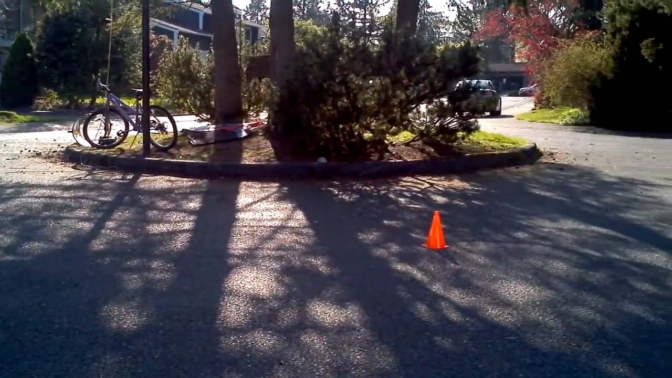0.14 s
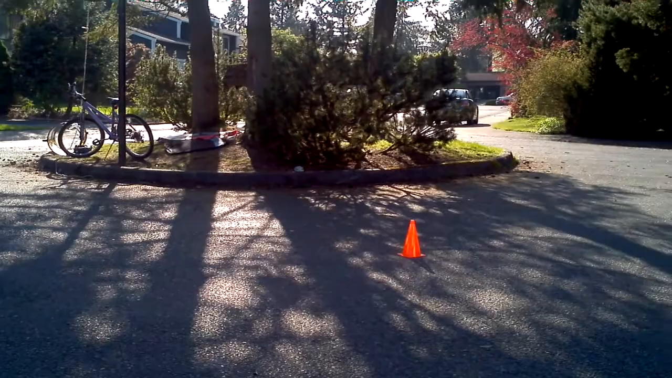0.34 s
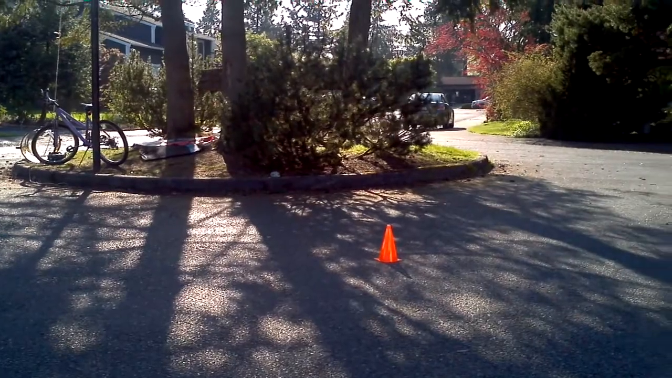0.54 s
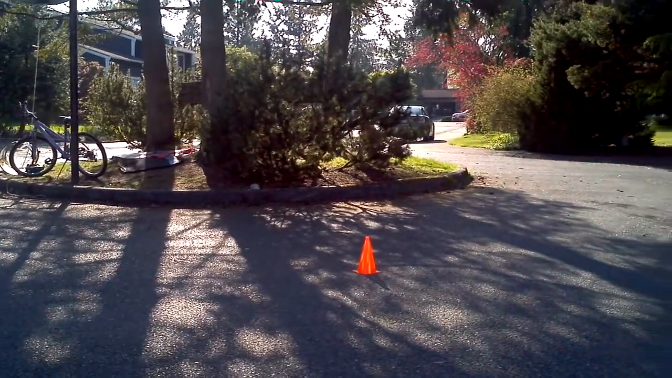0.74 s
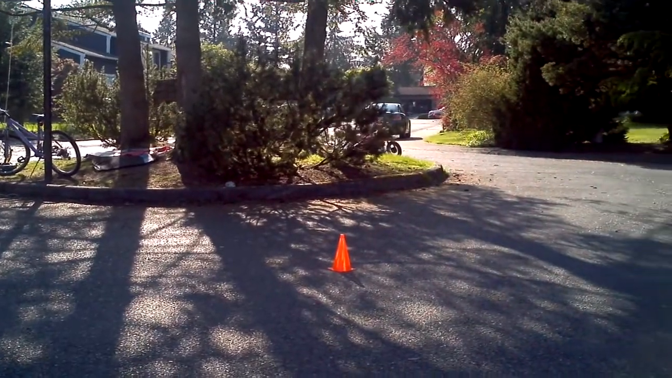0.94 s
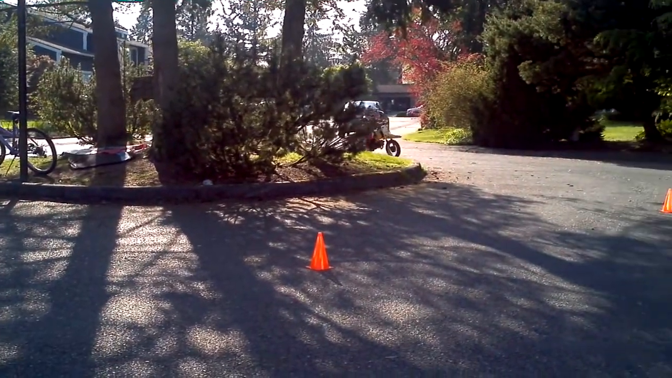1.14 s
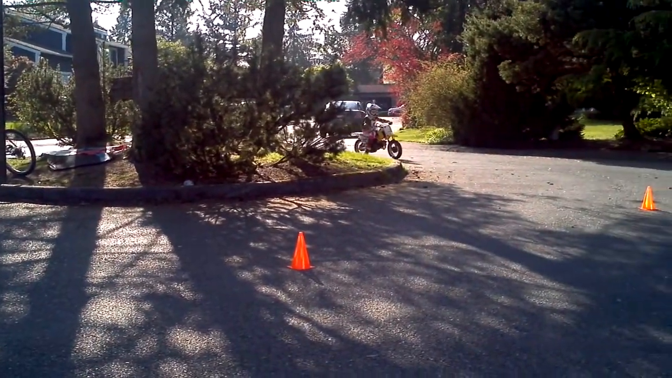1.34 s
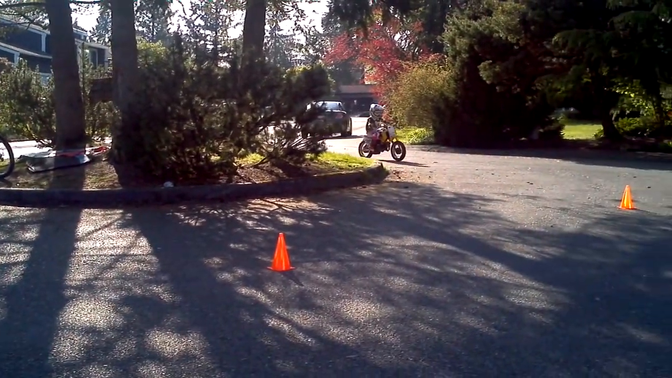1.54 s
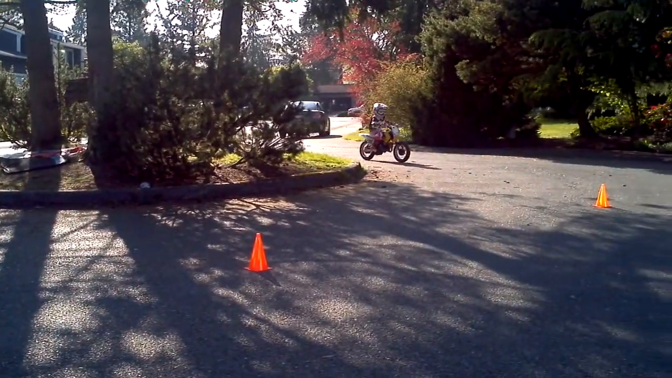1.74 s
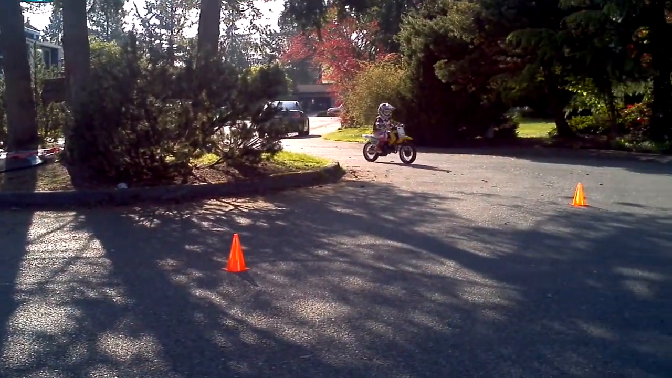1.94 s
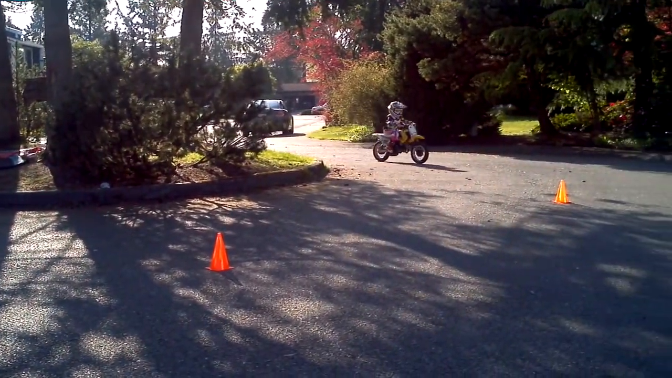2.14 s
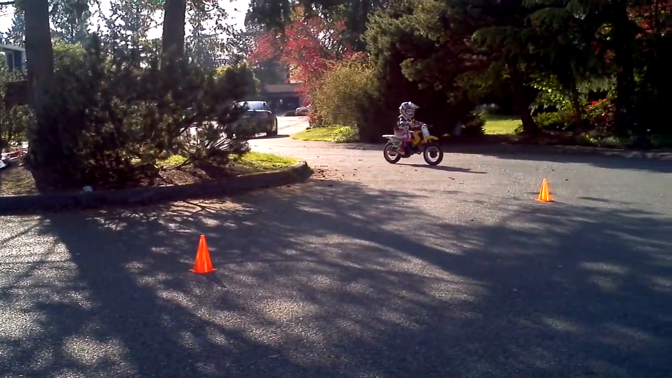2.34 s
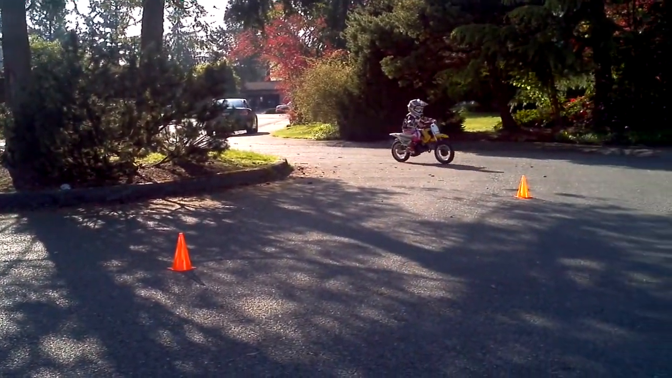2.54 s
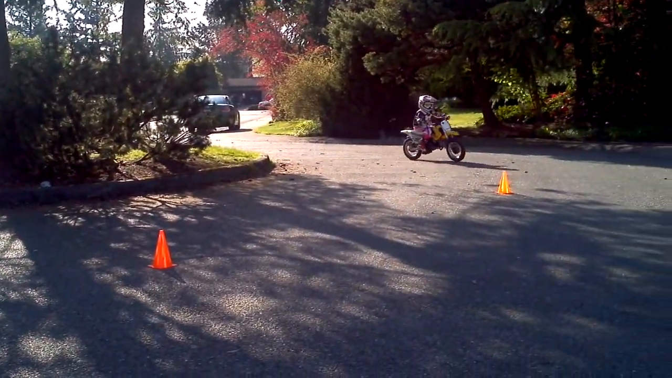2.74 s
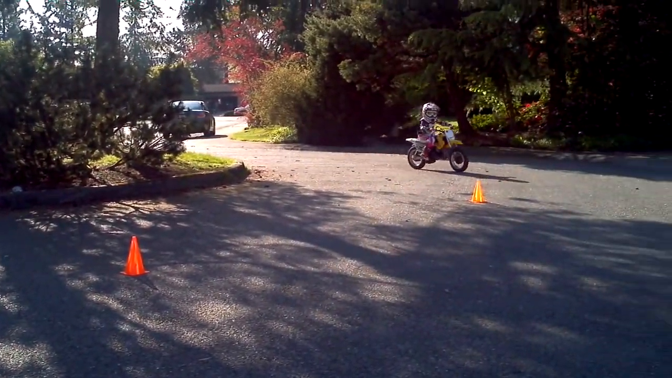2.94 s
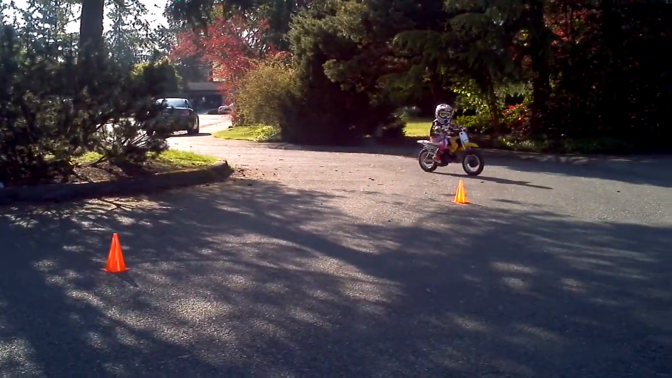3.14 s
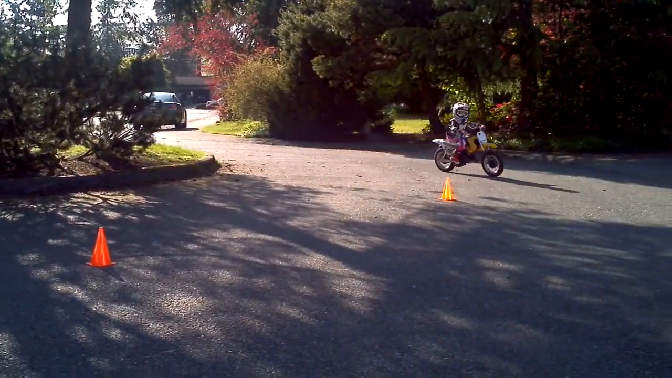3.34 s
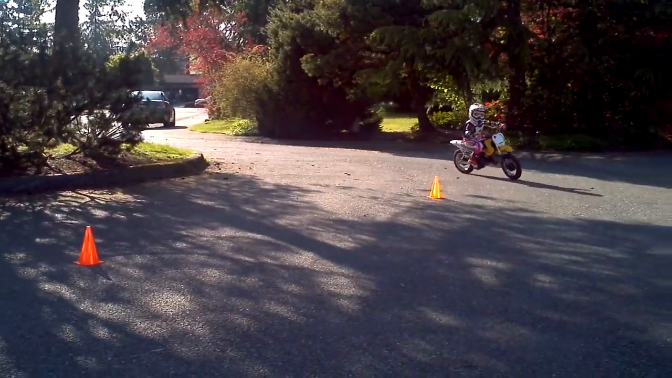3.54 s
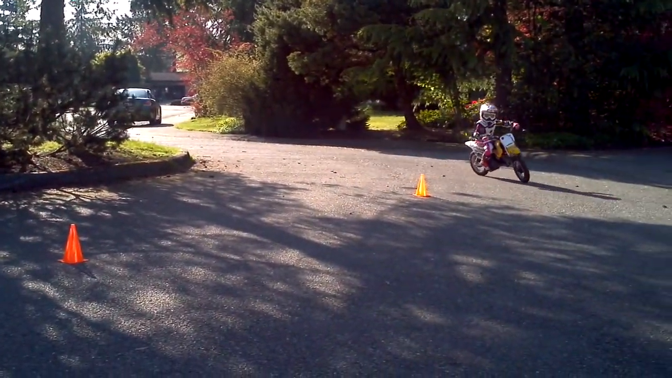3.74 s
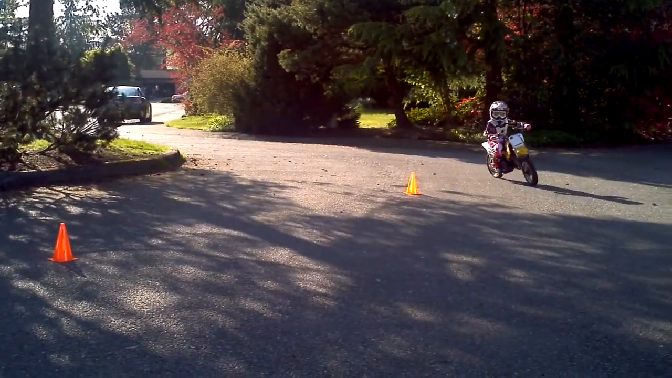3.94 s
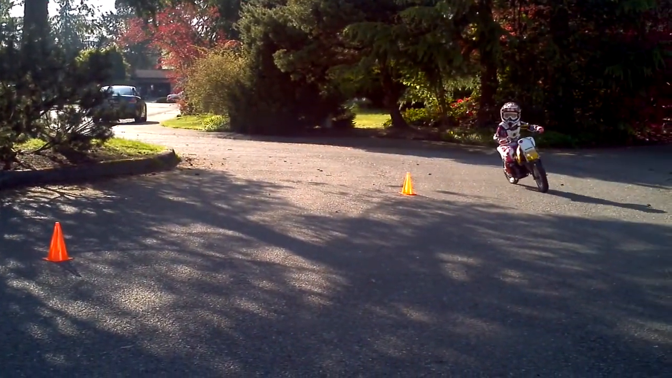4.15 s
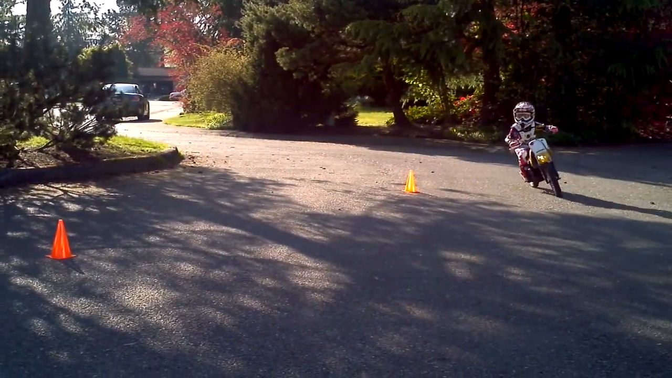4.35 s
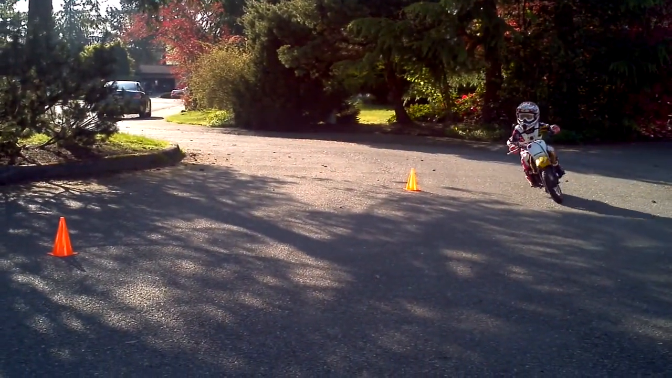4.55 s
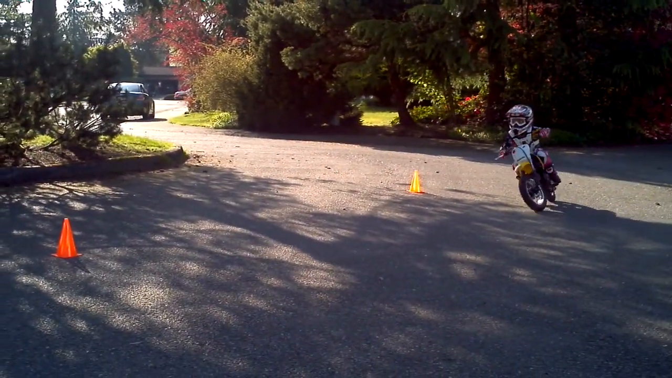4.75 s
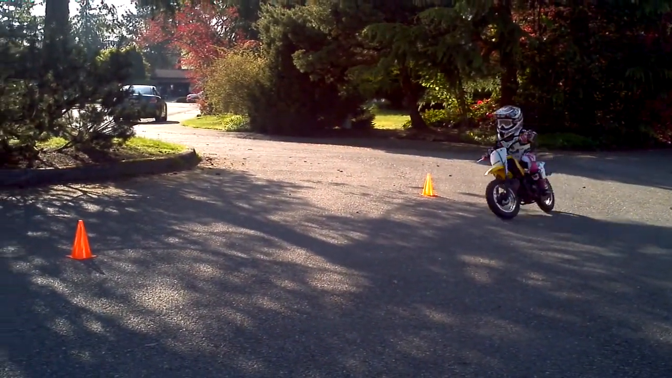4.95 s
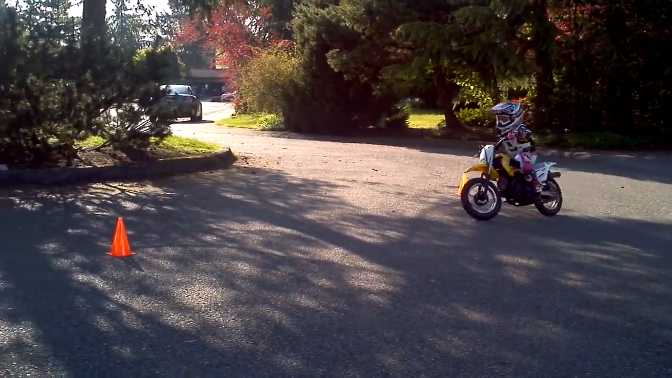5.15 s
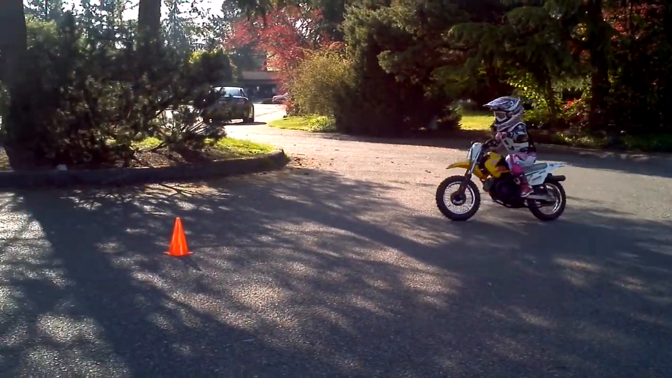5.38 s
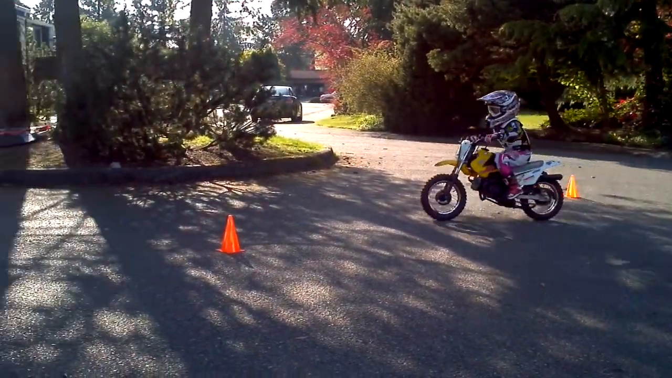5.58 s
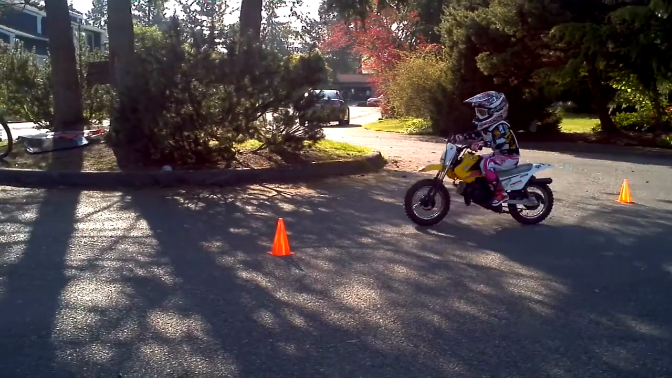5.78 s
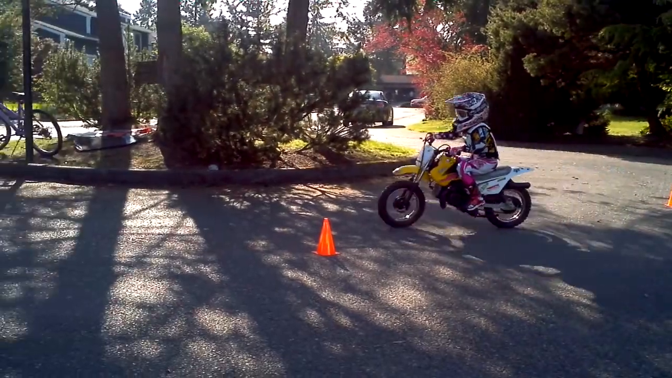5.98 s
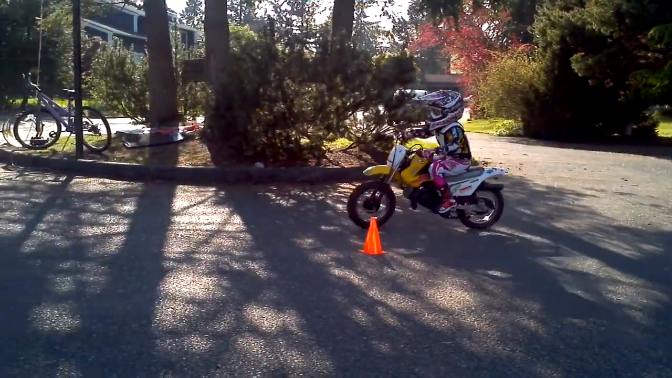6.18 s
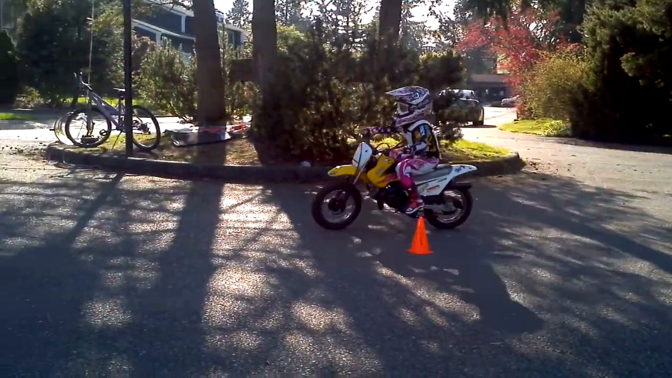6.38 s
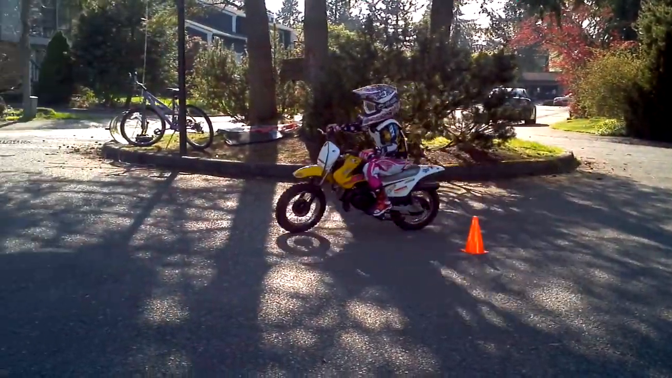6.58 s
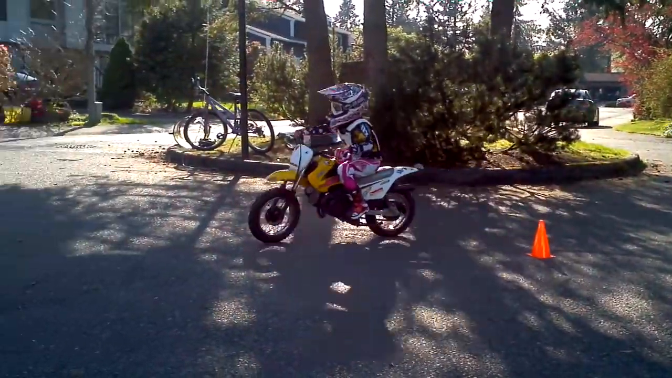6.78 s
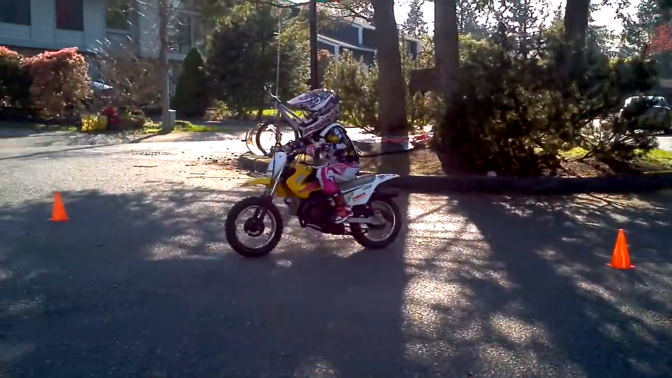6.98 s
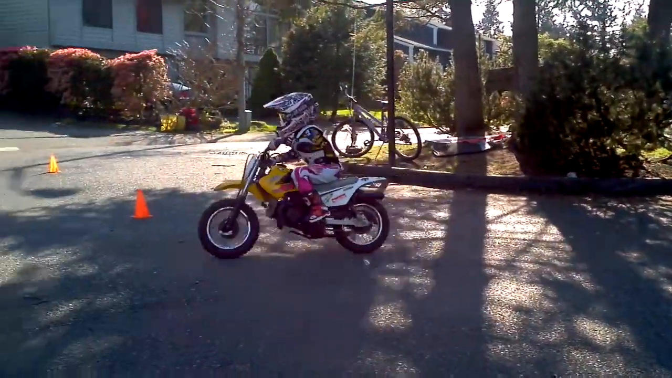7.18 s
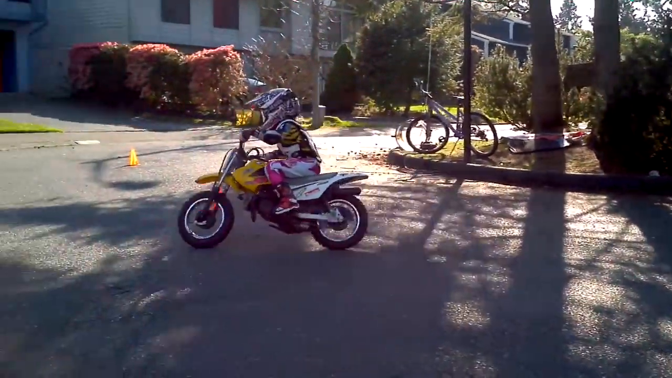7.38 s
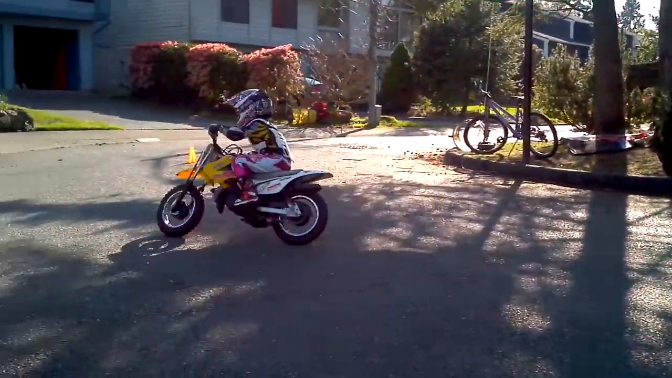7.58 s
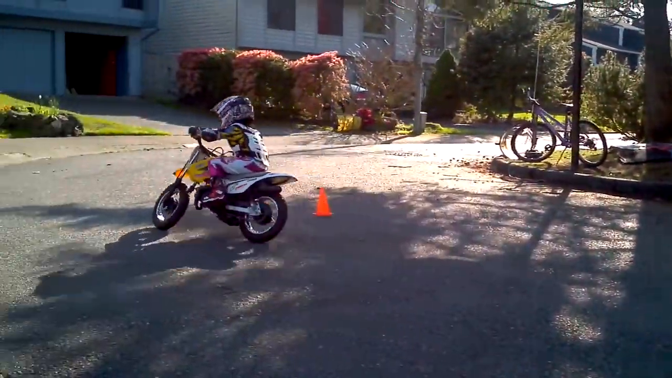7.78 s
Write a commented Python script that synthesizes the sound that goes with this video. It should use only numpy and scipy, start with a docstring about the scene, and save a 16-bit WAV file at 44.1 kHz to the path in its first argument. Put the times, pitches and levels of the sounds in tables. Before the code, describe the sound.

A quiet open street with faint far traffic and leaf hiss, heard through a small hand-held stereo microphone. In the first 0.6 seconds low wind puffs bump the microphone, strongest near 0.5, while a bird gives tiny falling chirps. A distant two-stroke motorbike putters weakly, about ten pops a second over soft rapid chugging. Around 1.3 to 1.6 it revs into a quicker, rising hooting buzz, then drops back to uneven pops. Birdsong flits faintly from 2.5 to 3.7, and a very thin high whine swells near 2.6. From 4 the engine grows nearer, hollow and irregular, with metallic ticking. From 5.8 to 6.5 it fires fast and evenly, a loud nasal buzz. By 7 it is closest: separate hard, raspy barks about ten per second, crackling with metal rattle, still loud when the sound stops just before 8.

```python
"""Two-stroke motorbike approaching on a quiet street

A small two-stroke putters ever closer to a hand-held camera: most firings come every second to fifth turn, ring
pipe and metal as decaying modes and add turbulent noise; the other turns chug in soft low cycles, blow the pipe
hoot weakly and beat the rattle. Far traffic and leaves are shaped noise, wind is lumpy bass noise with short
puffs, a far bird sings gliding sines, and a thin whine comes and goes. The two microphone ports are widened by
delayed subtraction."""
import sys
import numpy as np
from scipy import signal
from scipy.fft import rfft, irfft, next_fast_len
from scipy.io import wavfile
from scipy.ndimage import uniform_filter1d, map_coordinates

SR = 44100
rng = np.random.default_rng(int(sys.argv[2]) if len(sys.argv) > 2 else 0)


def pcm_store(signal):
    """Save signal as 16-bit PCM."""
    levels = np.round(np.clip(np.atleast_2d(signal), -1, 1) * 32767)
    wavfile.write(sys.argv[1], SR, levels.astype(np.int16).T)


def level_to_linear(level):
    """Convert decibel levels to linear amplitude factors, elementwise."""
    exponent = np.asarray(level, float) / 20
    return 10 ** exponent


N = 344862
T = np.arange(N) / SR  # s

# Crank speed and strength of the chug: time_s, turns_per_s, chug_db
RUNNING = [(0.0, 52, -59), (0.3, 48, -62.5), (0.59, 43, -59.5), (0.94, 44, -60), (1.222, 48, -55.5),
           (1.439, 50, -51), (1.57, 56, -55.5), (1.79, 44, -55.5), (2.41, 40, -53), (3.3, 46, -52),
           (3.739, 43.9, -49.5), (4.4, 44, -47), (5.0, 37, -44.5), (5.2, 45, -43.5), (5.599, 43.6, -42),
           (5.9, 48.3, -38), (6.119, 49.4, -39), (6.501, 45, -36), (6.66, 53, -39.5), (6.86, 42, -38.5),
           (7.82, 42, -37)]
# Colour as the bike turns and loads up: time_s, then re chug hoot_db, low_bark_db, body_db, crack_db,
# then re crack crankcase_db, cover_ring_db
COLOUR = [(0.2, -3, 7, 4, 2.5, -14, -14), (0.8, -5, 2, -2, 0.5, 7.5, 4), (1.35, 1.5, 8.5, 2, 3, -4, 3),
          (1.6, 1, 8.5, 9, -1, 1, 6), (2.1, -2.5, 2.5, 8.5, -1, -1, 3), (3.0, -2.5, -3, 11, -1.5, 3.5, 4),
          (3.9, 6.5, 3, 5, 0, 0, 7.5), (4.499, 6.5, 9.5, 9.5, -4.5, 5, 8),
          (5.001, 3, 6.5, 6.5, 3.5, 4.5, 4), (5.6, -7.5, 7.5, 7.5, 5.5, 1, 6.5),
          (6.2, -9.5, 9.5, 9.5, 8, 4.5, -25), (6.802, -7.5, 6.5, 6.5, 5.5, 0.5, 3),
          (7.3, -14.5, 11.5, 0, 3, 1, 3), (7.5, 0.5, 13.5, 8, 4.5, 2, 2.5), (7.8, -7, 11, -7, 1.5, 1.5, -1)]
# Drift of the pipe notes as the bike turns and loads up: time_s, hoot_percent, low_bark_percent,
# bark_percent, silencer_percent
DRIFT = [(0.3, -1.0, 6, 0.5, 0.1), (1.5, -1.1, -5.5, 2.4, 0.16), (3.0, -0.4, -5, 1.5, 0.1),
         (4.2, 1.5, -8, -1.5, 1.6), (5.0, 1.1, -8, -0.1, 1.8), (5.7, -1.15, -10.5, 0.8, 2.4),
         (6.5, -0.38, -12, -0.2, 1.33), (7.0, -1.5, -1, -1, 0.66), (7.8, -1.7, 1.0, 0, 0.26)]
# Hooting resonance of the exhaust pipe: pitch_hz, width_hz, level_db
HOOT_MODES = [(666.7, 33.7, 2.5)]
# Likeness of diffuse sound at the two ports: frequency_hz, likeness (0 to 1)
ECHO_ALIKE = [(150, 1), (350, 0.95), (900, 0.21), (2500, 0), (16000, 0.033)]


def read(points, hz):
    """Interpolates a spectrum linearly along a log-frequency axis."""
    f, value = np.transpose(points)
    return np.interp(np.log(hz + 1), np.log(f + 1), value)


def shape(x, points, scale=level_to_linear):
    """Linear filtering: multiplies the spectrum of x by a real gain, without phase shift."""
    size = next_fast_len(x.shape[-1] + 4096)
    gain = scale(read(points, np.fft.rfftfreq(size, 1 / SR)))
    return irfft(rfft(x, size) * gain, size)[..., :x.shape[-1]]


def clicks(s, gains):
    """Impulses: single samples at the given moments, ready for convolution."""
    out = np.zeros(N)
    at = np.round(np.asarray(s) * SR).astype(int)
    inside = (at >= 0) & (at < N)
    np.add.at(out, at[inside], (gains * np.ones(len(at)))[inside])
    return out


def gulp(parts, lean=0.):
    """Wave packets: a few cycles under a Gaussian; lean > 0 swells slowly and stops short, < 0 rings on."""
    t = np.arange(-1500, 1501) / SR
    out = 0
    for hz, cycles, glide, db in parts:
        cycle = np.sin(2 * np.pi * hz * t * (1 + glide * t * hz / cycles))
        swell = np.exp(-(2 * t * hz / cycles / (1 - lean * np.sign(t))) ** 2)
        out = out + level_to_linear(db) * cycle * swell
    return out


def ring(x, modes, drift=0.):
    """Modal resonance by heterodyning: shift down, smooth by the mode's width, shift back; drift in %."""
    out = np.zeros(N)
    clock = np.cumsum((1 + drift / 100) * np.ones(N)) / SR
    for hz, width, db in modes:
        r = np.exp(-np.pi * width / SR)
        turn = np.exp(2j * np.pi * hz * clock)
        smooth = signal.lfilter([np.sqrt((1 - r) / (1 + r))], [1, -r], x * turn.conj())
        out += level_to_linear(db) * 2 * (turn * smooth).real
    return out


def street():
    """Partial coherence: steady shaped noise, alike at both ports only in the bass."""
    # Still air, far traffic and leaves: frequency_hz, level_db_per_hz
    street_spectrum = [(40, -106), (200, -74), (600, -92), (1200, -94), (2500, -100), (4400, -109),
                       (7000, -103), (9000, -103), (11000, -107), (15500, -111)]
    shared, other = rng.standard_normal((2, N)) * np.sqrt(SR / 2)
    own = shape(other, ECHO_ALIKE, lambda c: np.sqrt(1 - np.clip(c, 0, 1) ** 2))
    return shape(np.array([shared, shape(shared, ECHO_ALIKE, np.asarray) + own]), street_spectrum)


def small_puffs():
    """Poisson-like chance: independent draws whose rate decays as the wind drops."""
    per_s, middle_db, calming_s = 14, -36.5, 1.4
    chance, size, pitch = rng.random((round(T[-1] * 100), 3)).T
    s = np.arange(len(chance)) / 100
    rows = np.c_[s, middle_db - 10 * (size - .5), 120 + 80 * pitch]
    return rows[chance < per_s / 100 * np.exp(-s / calming_s)]


def wind(lumpy_db=3.5, cycles=1.12, far_db=-5):
    """Local turbulence: rumble unrelated at the two ports, and single pressure puffs on the near one."""
    # Rumble strength: time_s, level_db
    wind_level = [(0.0, -42.5), (0.3, -44.5), (0.55, -50), (0.9, -65), (2.1, -60.5), (2.7, -73), (3.9, -60),
                  (5.7, -65), (6.3, -62), (7.8, -68)]
    # Rumble spectrum: frequency_hz, relative_db
    wind_colour = [(15, 17), (50, 10), (130, 11), (260, 10.5), (450, -21), (900, -104)]
    # Single wind puffs placed in time: time_s, relative_db, pitch_hz
    gusts = [(0.04, -39, 198), (0.065, -33, 197), (0.111, -26, 279), (0.118, -29, 130), (0.167, -34, 240),
             (0.201, -36, 127), (0.243, -32.5, 150), (0.3, -40, 110), (0.342, -30, 230), (0.354, -29, 200),
             (0.368, -34, 225), (0.405, -33, 179), (0.432, -38, 199), (0.503, -20, 216), (0.52, -32, 152),
             (1.071, -35.5, 131), (1.732, -33.5, 178), (2.171, -34, 148.4), (4.474, -38, 129.1)]
    rumble = shape(rng.standard_normal((2, N)), wind_colour)
    rumble /= rumble.std()
    lumps = uniform_filter1d(rng.standard_normal((2, N)), 900) * 30
    out = rumble * level_to_linear(np.interp(T, *np.transpose(wind_level)) + lumpy_db * lumps)
    for s, db, hz in [*gusts, *small_puffs()]:
        puff = gulp([(hz, cycles, -.3, db + 5.0), (1.43 * hz, cycles, -.3, db)])
        out[0] += signal.oaconvolve(clicks([s], -0.57), puff, "same")
    return out * level_to_linear([[0], [far_db]])


def fired():
    """Crank phase is the integral of speed: even runs are spaced by turns; gives moments and bark dB."""
    # Firings that come unevenly: time_s, bark_db
    uneven_firings = [(0.107, -45), (0.208, -46), (0.336, -50), (0.4269, -44), (0.5262, -46),
                      (0.6235, -42.5), (0.7269, -45), (0.847, -43.5), (0.9653, -43), (1.062, -44.5),
                      (1.1305, -40.5), (1.1964, -44), (1.6385, -39.5), (1.7259, -41.5), (1.7971, -38.5),
                      (2.3672, -42), (2.4171, -37.5), (2.5125, -31.5), (2.6326, -33), (2.7284, -49),
                      (2.7782, -54), (2.8777, -37), (2.978, -36), (3.071, -37.5), (3.2165, -45),
                      (3.6995, -42.5), (4.1709, -41.5), (4.2147, -39.5), (4.2804, -36), (4.3234, -39),
                      (4.606, -45), (4.647, -36), (4.7138, -31.5), (4.7584, -36.5), (4.8244, -30.5),
                      (4.8693, -37), (4.913, -31.5), (4.9586, -38.5), (5.0028, -33.5), (5.0708, -31),
                      (5.1381, -62), (5.186, -32.5), (5.2771, -29), (5.3695, -35.5), (5.4393, -34),
                      (5.5111, -55), (5.5588, -30), (5.6275, -31.5), (5.6741, -31), (5.7408, -28.5),
                      (6.559, -28.5), (6.601, -28.5), (6.669, -32), (6.7153, -27), (6.8109, -27.5),
                      (6.8834, -33), (6.9326, -50), (6.982, -21.5), (7.079, -16), (7.1736, -32),
                      (7.224, -18.5), (7.3189, -17), (7.4146, -20), (7.5095, -18), (7.6051, -20.5),
                      (7.702, -18), (7.802, -18.5)]
    # Firings the same number of turns apart: first_s, last_s, firings, first_bark_db, last_bark_db
    even_runs = [(1.263, 1.5784, 9, -49.5, -39.5), (1.8932, 2.272, 5, -33.5, -32),
                 (3.3157, 3.605, 4, -38.5, -39), (3.7668, 4.106, 6, -41, -35.5),
                 (4.386, 4.561, 5, -39.5, -35), (5.7846, 6.1133, 9, -28, -25),
                 (6.155, 6.52, 10, -25.5, -23.5)]
    when, speed = np.transpose(RUNNING)[:2]
    turns = np.cumsum(np.interp(T, when, speed)) / SR
    runs = []
    for first_s, last_s, count, first_db, last_db in even_runs:
        count = round(count)
        at_turns = np.linspace(*np.interp([first_s, last_s], T, turns), count)
        runs.append(np.c_[np.interp(at_turns, turns, T), np.linspace(first_db, last_db, count)])
    rows = np.vstack([uneven_firings, *runs])
    return rows[np.argsort(rows[:, 0])].T


def crank(late=0.206, slowing=0.016):
    """Rotational inertia: idle turns between firings trail the firing beat as the crank coasts (in turns)."""
    s = np.r_[.01, fired()[0], T[-1] + .08]
    when, speed = np.transpose(RUNNING)[:2]
    counts = np.maximum(np.round(np.diff(s) * np.interp(s[1:], when, speed)), 1).astype(int)
    idle = []
    for start, end, n in zip(s, s[1:], counts):
        k = np.arange(1, n)
        idle.append(start + (end - start) * (k + late + slowing * (k - 1)) / n)
    return np.concatenate(idle)


def chug(idle, spread_db=.9):
    """Pulsating gas flow: every turn, fired or not, gulps a short low wave packet."""
    # Gulp of an idle turn: pitch_hz, cycles, upward_glide, relative_db
    idle_gulp = [(221, 3.16, 0.0, 8.5), (254, 4, 0.011, -2.5), (329, 6.5, 0.0, -5), (140, 0.44, 0.0, -3)]
    # Gulp of a firing: pitch_hz, cycles, upward_glide, relative_db
    fired_gulp = [(230, 2.26, 0.0, 14), (396.5, 1.5, 0.0, -10.5), (125, 0.51, 0.3, 5)]
    idle_lag_s, fired_lag_s = 0.00532, 0.00387  # the gulp follows the turn
    first_idle_db = 2.5  # the turn after a firing gulps hardest
    when, _, level_db = np.transpose(RUNNING)
    s = fired()[0]
    first = np.diff(np.searchsorted(s, idle), prepend=-1) > 0
    idle_db = first_idle_db * first + spread_db * rng.standard_normal(len(idle))
    weak = clicks(idle + idle_lag_s, level_to_linear(idle_db))
    strong = clicks(s + fired_lag_s, 0.99)
    both = signal.oaconvolve(weak, gulp(idle_gulp, .25), "same")
    both += signal.oaconvolve(strong, gulp(fired_gulp, -.3), "same")
    return level_to_linear(np.interp(T, when, level_db)) * both


def blast(db, peak_s, fall_s, early_s=0.0053):
    """Gas discharge: an envelope for each firing with a soft swell, then exponential decay."""
    t = np.arange(3000) / SR
    burst = (1 - np.exp(-(t / peak_s) ** 2)) * np.exp(-t / fall_s)
    return signal.oaconvolve(clicks(fired()[0] - early_s, level_to_linear(db)), burst / burst.max())[:N]


def pop(db, modes, swell, early_s, drift):
    """Impulse response: each firing rings the modes in fixed phase; narrow modes swell more slowly."""
    t, out = np.arange(3000) / SR, np.zeros(N + 3000)
    pitch = 1 + drift[:, None] / 100
    rings = 0
    for k, (hz, width, mode_db) in enumerate(modes):
        sine = np.sin(2 * np.pi * hz * pitch * t)
        envelope = np.exp(-np.pi * width * t) * 2 * (1 - np.exp(-(t * width / swell) ** 2))
        rings = rings + (-1) ** k * level_to_linear(mode_db) * sine * envelope
    starts = np.round((fired()[0] - early_s) * SR).astype(int)
    for at, gain, sound in zip(starts, level_to_linear(db), rings):
        out[at:at + len(t)] += gain * sound
    return out[:N]


def firing_levels():
    """Excitation of modes: each part follows a share of a firing's strength, with chance; gives levels in dB."""
    # Ends of the pipe: time_s, exhaust_port_db re chug, silencer_db re bark
    pipe_ends = [(0.3, -13, -1.5), (1.5, -21, 3.5), (2.5, -24, -3), (3.6, -5, 6), (4.4, 7, 4),
                 (4.9, 3, 3.5), (5.4, 0.5, 1), (6.2, 6, 3.5), (6.9, -2, -4), (7.3, -2, -9), (7.45, 5, -6),
                 (7.8, 6, -3)]
    s, bark_db = fired()
    when, _, chug_db = np.transpose(RUNNING)
    turned, *parts = np.transpose(COLOUR)[:5]
    base_db = np.interp(s, when, chug_db)
    shares = (0.34, 0.072, 0.072, 0.42)  # hoot, low bark, body, crack
    hoot_db, low_db, body_db, crack_db = (
        base_db + np.interp(s, turned, part_db) + share * (bark_db - base_db) + rng.standard_normal(len(s))
        for part_db, share in zip(parts, shares))
    seen, port_db, silencer_db = np.transpose(pipe_ends)
    port_db = hoot_db - np.interp(s, turned, parts[0]) + np.interp(s, seen, port_db)
    trade_db = 1.3 * rng.standard_normal(len(s))  # bark and silencer trade strength
    silencer_db = bark_db + np.interp(s, seen, silencer_db) + trade_db
    return base_db, hoot_db, low_db, body_db, crack_db, port_db, silencer_db, bark_db - trade_db


def turn_beat(idle):
    """Amplitude modulation: an envelope that jumps at each idle turn and decays, scaled as the chug."""
    when, _, level_db = np.transpose(RUNNING)
    decay = np.exp(-np.arange(1500) / SR / 0.056)
    beat = 0.55 + .5 * signal.oaconvolve(clicks(idle, 0.093), decay)[:N]
    return beat * level_to_linear(np.interp(T, when, level_db))


def unburnt_puffs(idle, hoot_db):
    """Pulse-excited resonance: unburnt charges still blow the pipe, more weakly."""
    puff_db = np.interp(idle, fired()[0], hoot_db) - 6.5
    pulses = signal.oaconvolve(clicks(idle, -level_to_linear(puff_db)), np.hanning(24))[:N]
    when, hoot = np.transpose(DRIFT)[:2]
    return ring(pulses, HOOT_MODES, np.interp(T, when, hoot))


def pipe_notes(levels, drone, calm, rough_db=-19):
    """Resonance of the gas path: firings ring its modes and turbulent noise roughens them."""
    # Resonances of the gas path, each table: pitch_hz, width_hz, relative_db
    bark_modes = [(1977, 94, 2), (2140, 49, -13), (1802, 110, -11)]
    low_modes = [(443, 164, 5), (558, 94, -3.5)]
    body_modes = [(953.5, 95, 1), (1076, 46, -7), (1250, 65, -7.5), (1423, 96, -7)]
    port_modes = [(1153, 67, 0)]
    silencer_modes = [(1564, 59, 1)]  # fills slowly after each firing
    intake_modes = [(498, 12.3, -1.5)]
    # A narrow intake note with the throttle open: time_s, drift_percent, level_db re chug
    intake_note = [(1.33, 0.3, -23), (1.41, 1.8, 5.5), (1.5, 4.1, 1), (1.58, 7.8, 0), (1.68, 12, -22)]
    # The exhaust port note moves most: time_s, drift_percent
    port_drift = [(5.2, -1), (5.9, 9.5), (6.6, 7.5), (7.1, 2), (7.38, -10.5)]
    base_db, hoot_db, low_db, body_db, _, port_db, silencer_db, bark_db = levels
    s = fired()[0]
    when, *drifts = np.transpose(DRIFT)
    hoot, low, bark, silencer = (np.interp(T, when, drift) for drift in drifts)
    port = np.interp(T, *np.transpose(port_drift))
    opened, intake, intake_db = np.transpose(intake_note)
    intake = np.interp(T, opened, intake)
    intake_db = base_db + np.interp(s, opened, intake_db)
    # level_db, modes, share of the drone, swell, early_s, drift_percent, pitch_scatter_percent
    notes = [(hoot_db, HOOT_MODES, .4, .2, .002, hoot, 0),
             (port_db, port_modes, .15, .3, .004, port, 0),
             (low_db, low_modes, .18, .34, .002, low, 0),
             (body_db, body_modes, .35, .4, .0035, 0 * T, 0),
             (bark_db, bark_modes, .4, .45, .0025, bark, .8),
             (silencer_db, silencer_modes, .3, .55, .0005, silencer, .8),
             (intake_db, intake_modes, 0, .1, .002, intake, 0)]
    out = np.zeros(N)
    for db, modes, share, swell, early_s, drift, scatter in notes:
        envelope = np.hypot(blast(db + rough_db, peak_s=0.027, fall_s=0.0048), share * drone)
        gas = calm * rng.standard_normal(N) * envelope
        pitch_drift = np.interp(s, T, drift) + scatter * rng.standard_normal(len(s))
        out += ring(gas, modes, drift) - pop(db, modes, swell, early_s, pitch_drift)
    return out


def pipe_rush(body_db, drone, calm):
    """Jet noise: a broadband burst of turbulence in the pipe at each firing, over a steady drone."""
    # Hiss of the pipe: frequency_hz, relative_db
    pipe_hiss = [(100, -48), (300, -12), (450, -0.5), (1200, -6), (2400, -14), (2900, -104), (4000, -30.5)]
    envelope = np.hypot(blast(body_db - 10.5, peak_s=0.0025, fall_s=0.019), drone)
    return 9.2 * shape(calm * rng.standard_normal(N) * envelope, pipe_hiss)


def metal(crack_db, beat):
    """Structural vibration: noise bursts and a rattle each turn excite crankcase, cover and cooling fins."""
    # Resonances of the metal, each table: pitch_hz, width_hz, relative_db
    case_modes = [(2442, 49, -12), (3328, 37, -26.5), (3857, 99, -23), (6420, 63, -21)]
    cover_modes = [(4850, 220, -21.5), (5350, 260, -19.5)]
    fin_modes = [(6900, 72, -29), (7545, 120, -24), (7750, 130, -14), (8170, 48, -19), (8680, 28, -11.5),
                 (9140, 38, -13), (9580, 145, -10), (9970, 190, -16.5), (11200, 180, -58)]
    # Hiss of crankcase and of fins, each table: frequency_hz, relative_db
    case_hiss = [(2000, -133), (3200, -8), (4400, -26), (5600, -11.5), (7000, -76)]
    fin_hiss = [(5200, -91), (6800, -9.5), (8800, -10.5), (10300, -12), (12000, -25), (15500, -31)]
    turned, _, _, _, treble_db, case_db, cover_db = np.transpose(COLOUR)
    # the rattle follows the treble crack in part
    rattle = beat * level_to_linear(-0.5 + 0.31 * np.interp(T, turned, treble_db))
    uneven_db = crack_db + 1.2 * rng.standard_normal(len(crack_db))
    crack = rng.standard_normal(N) * np.hypot(blast(uneven_db, peak_s=0.015, fall_s=0.0046), rattle)
    case = crack * level_to_linear(np.interp(T, turned, case_db))
    cover = crack * level_to_linear(np.interp(T, turned, cover_db))
    out = ring(case, case_modes) + 1.01 * shape(case, case_hiss) + ring(cover, cover_modes)
    return out + ring(crack, fin_modes) + 2.0 * shape(crack, fin_hiss)


def second_crack():
    """Transient wave packet: one firing cracks twice, and this is the extra crack."""
    # The extra crack, one row: time_s, level_db, pitch_hz
    snap = (7.5155, -14.5, 1160)
    s, db, hz = snap
    return signal.oaconvolve(clicks([s], 1), gulp([(hz, 1.5, 0, db)]), "same")


def engine():
    """Superposition: gulps, resonant pipe notes, turbulence and ringing metal add linearly."""
    # Even firing under load is cleaner: time_s, turbulence_db
    turbulence = [(1.2, -1), (1.35, -5), (1.6, -5), (1.75, -2), (5.6, -2), (5.85, -7), (6.5, -7), (6.7, -2)]
    calm = level_to_linear(np.interp(T, *np.transpose(turbulence)))
    levels = firing_levels()
    _, hoot_db, _, body_db, crack_db, *_ = levels
    idle = crank()
    beat = turn_beat(idle)
    drone = beat * level_to_linear(-3)
    out = chug(idle) + unburnt_puffs(idle, hoot_db)
    out += pipe_notes(levels, drone, calm) + pipe_rush(body_db, drone, calm)
    return out + metal(crack_db, beat) + second_crack()


def tone(rows, edge, blur):
    """Frequency modulation: a sine whose phase integrates a pitch curve, its level fluttering."""
    s, hz, db = np.transpose(rows)
    inside = (T >= s[0]) & (T < s[-1])
    flutter = 1 + blur * uniform_filter1d(rng.standard_normal(N), 400) * 20
    gain = np.zeros(N)
    gain[inside] = signal.windows.tukey(inside.sum(), edge)
    pitch = uniform_filter1d(np.interp(T, s, hz), 200)
    sine = np.sqrt(2) * np.sin(2 * np.pi * np.cumsum(pitch) / SR)
    return gain * flutter * level_to_linear(np.interp(T, s, db)) * sine


def note(start, length, first_hz, last_hz, db, curve):
    """Pitch glide by a power law: curve under 1 is fast then settling, over 1 late."""
    u = np.linspace(0, 1, 16)
    pitch = first_hz + (last_hz - first_hz) * u ** curve
    return tone(np.c_[start + length * u, pitch, db + 0 * u], edge=0.089, blur=0.46)


def bird():
    """Near-sinusoidal song: a sequence of short gliding notes without overtones."""
    # Notes: start_s, length_s, first_hz, last_hz, level_db, glide_curve
    bird_notes = [(0.033, .04, 3240, 3070, -60, .6), (0.073, 0.048, 2980, 2380, -62, 0.45),
                  (0.11, 0.052, 2290, 2285, -61, 0.55), (0.16, 0.096, 2310, 2356, -65, 0.56),
                  (0.25, .05, 2700, 2630, -66, 0.67), (0.81, 0.066, 2620, 2320, -65, .6),
                  (2.496, 0.06, 2840, 2940, -62, 0.66), (2.546, 0.059, 2600, 2340, -61, 0.73),
                  (2.597, 0.075, 2140, 2110, -58.5, 1.2), (3.0, 0.037, 2950, 3270, -59, 0.31),
                  (3.035, 0.075, 3200, 2290, -57, 0.35), (3.105, 0.097, 2470, 2660, -59, 1.8),
                  (3.387, 0.033, 3340, 3120, -59, 0.46), (3.55, 0.028, 3000, 3130, -61, .4),
                  (3.575, 0.035, 3130, 3040, -65, 1.4), (3.69, 0.025, 2270, 2480, -60, 1.2),
                  (3.725, 0.038, 3280, 2600, -59, .35), (5.69, 0.033, 2940, 2790, -56, .6)]
    return sum(note(*row) for row in bird_notes)


def whine():
    """Pure tone: one thin sine high in the treble, swelling and fading with a slight glide."""
    # Pitch and level curve: time_s, pitch_hz, level_db
    whine_curve = [(2.05, 7200, -87), (2.3, 7050, -71), (2.6, 7010, -64), (2.75, 7100, -82)]
    return tone(whine_curve, edge=0.24, blur=0.98)


def at_ports(x, echo_db):
    """Diffraction, delay and reverberation: the far port is shadowed and late; houses add a diffuse tail."""
    # Far port against near port: frequency_hz, level_db
    shadow = [(100, 2.5), (240, 0), (350, -7), (650, 0), (850, -11), (1200, -3.5), (2000, -14),
              (3700, -9.5), (6000, -12), (9000, -15), (13000, -85)]
    # Lag of the far port: time_s, lag_samples
    port_lag = [(0, 5.2), (3.8, 0.19), (5, 0.051), (6.3, 1.4), (7.8, 4.34)]
    # Decay time of the echo by 60 dB: frequency_hz, decay_s
    echo_t60 = [(200, 0.58), (1000, 0.049), (4000, 0.39), (12000, 0.02)]
    lag = np.interp(T, *np.transpose(port_lag))
    far = map_coordinates(shape(x, shadow), [np.arange(N) - lag], order=3)
    size = (2, SR // 2)
    # sparse random reflections after a short gap
    taps = rng.standard_normal(size) * (rng.random(size) < .1) * (np.arange(SR // 2) > 250)
    hz, t, z = signal.stft(taps, SR, nperseg=256)
    alike = np.clip(read(ECHO_ALIKE, hz), 0, 1)[:, None]
    z = np.array([z[0], alike * z[0] + np.sqrt(1 - alike ** 2) * z[1]])
    z = z * level_to_linear(-60 * t / read(echo_t60, hz)[:, None])
    tail = signal.istft(z, SR, nperseg=256)[1]
    echo = signal.fftconvolve(x[None], tail / np.linalg.norm(tail[0]), axes=1)[:, :N]
    return np.array([x, far]) + level_to_linear(echo_db) * echo


def scene():
    """Superposition of pressures: what reaches the two microphone ports."""
    bike = engine() + whine()
    return street() + wind() + at_ports(bike, echo_db=-14) + at_ports(bird(), echo_db=-17)


def band_limit(x):
    """A steep low-pass at the top of the band."""
    return signal.sosfilt(signal.butter(12, 15940, fs=SR, output="sos"), x)


def record(dry):
    """Delay-and-subtract widening after an uneven bass response; it combs the sum and the difference."""
    # Response of the microphone: frequency_hz, gain_db
    microphone = [(20, 3.5), (60, -7), (80, 2), (110, 6.5), (200, -0.46)]
    cross_delay = 15  # samples
    ports = shape(dry, microphone)
    other_port_late = np.pad(ports[::-1], ((0, 0), (cross_delay, 0)))[:, :N]
    wide = ports - other_port_late
    return band_limit(wide)


dry = scene()
out = record(dry)
pcm_store(out)
```